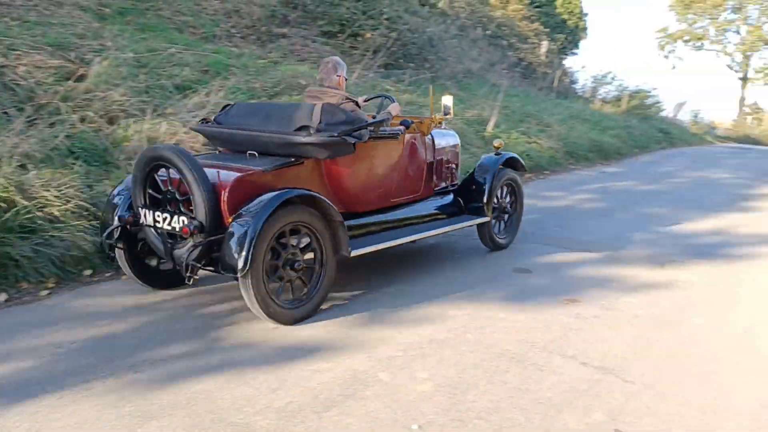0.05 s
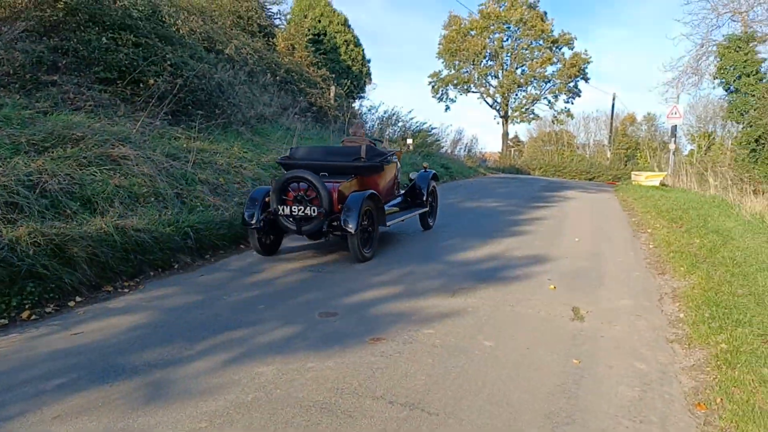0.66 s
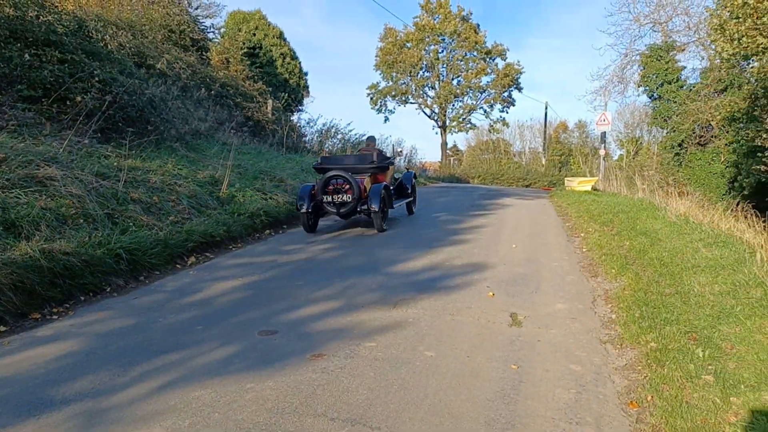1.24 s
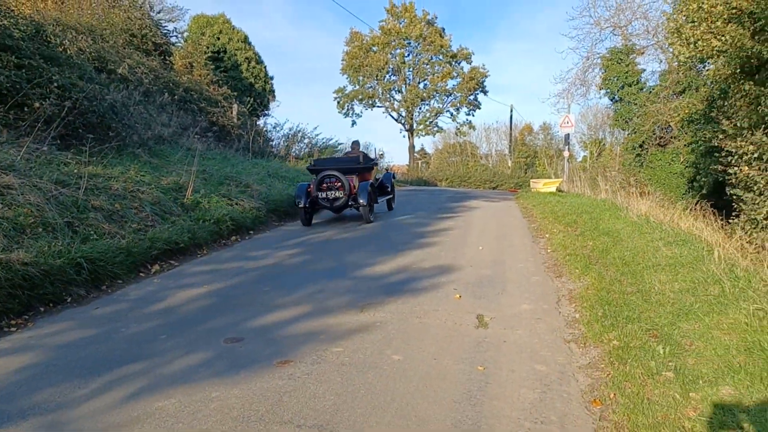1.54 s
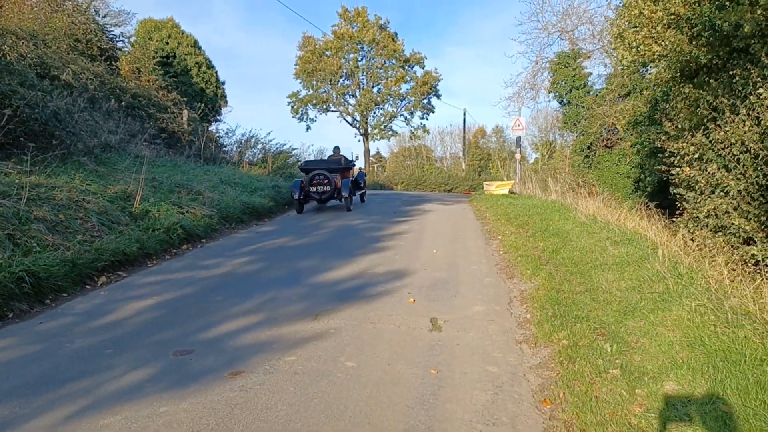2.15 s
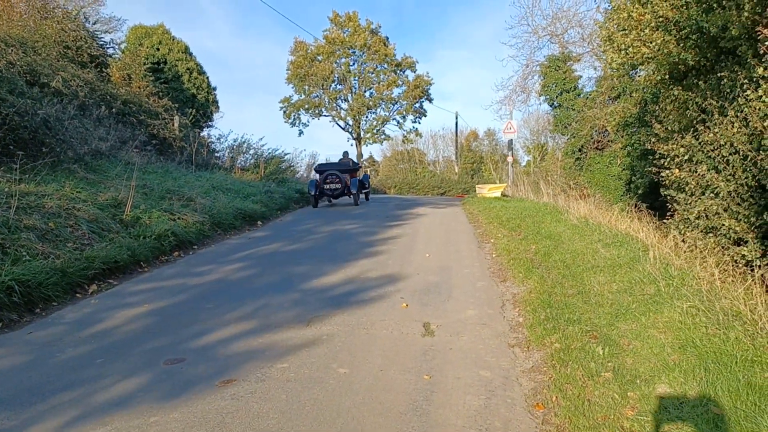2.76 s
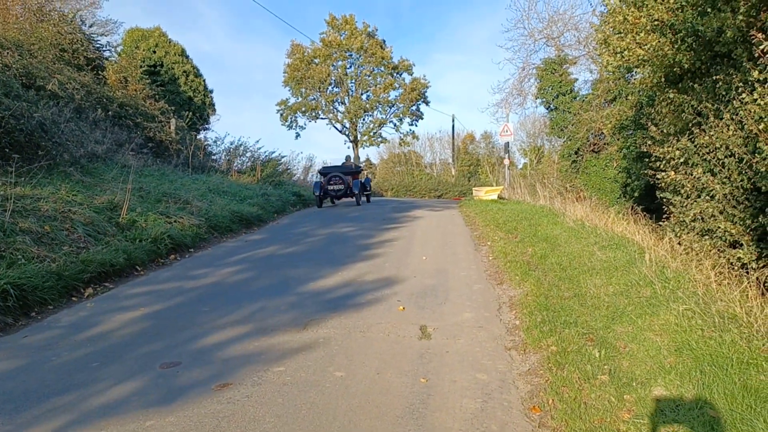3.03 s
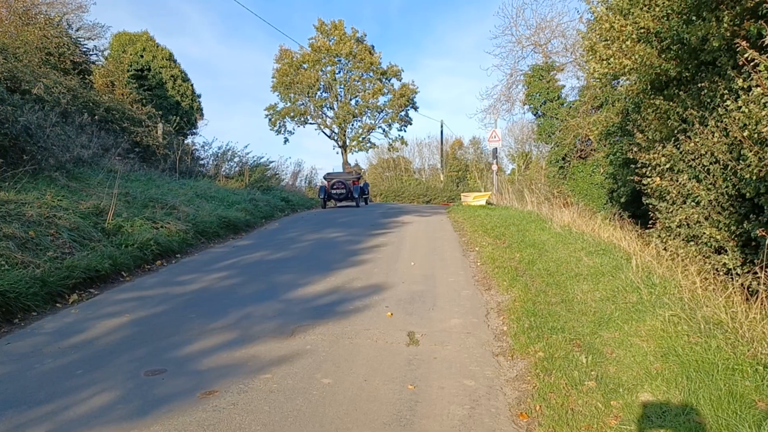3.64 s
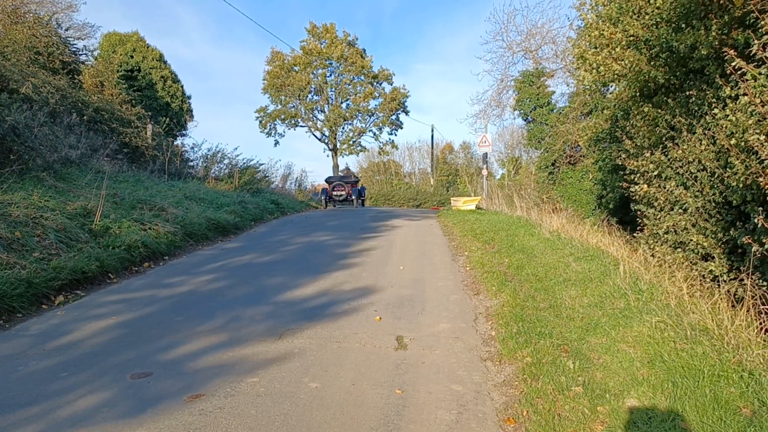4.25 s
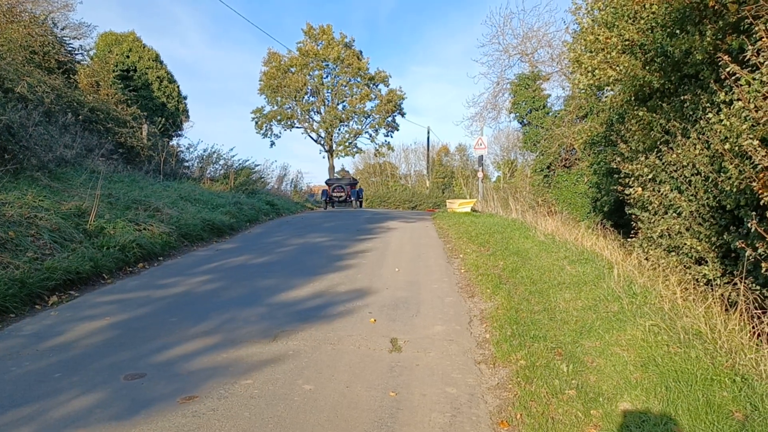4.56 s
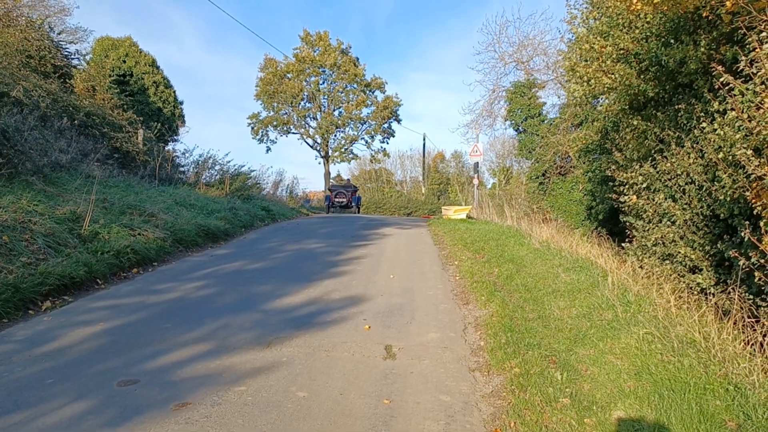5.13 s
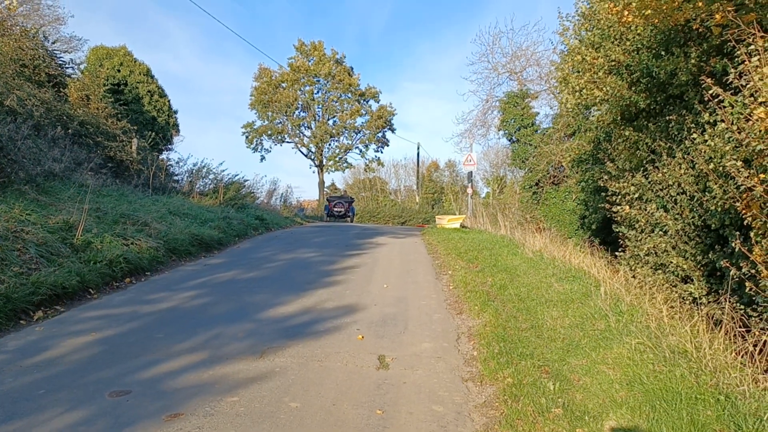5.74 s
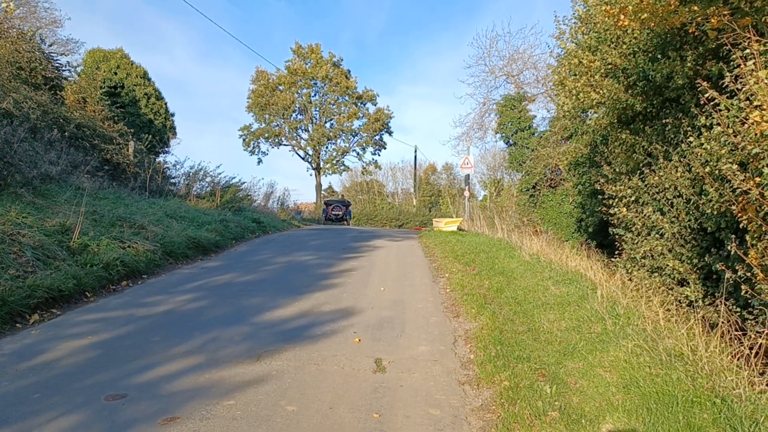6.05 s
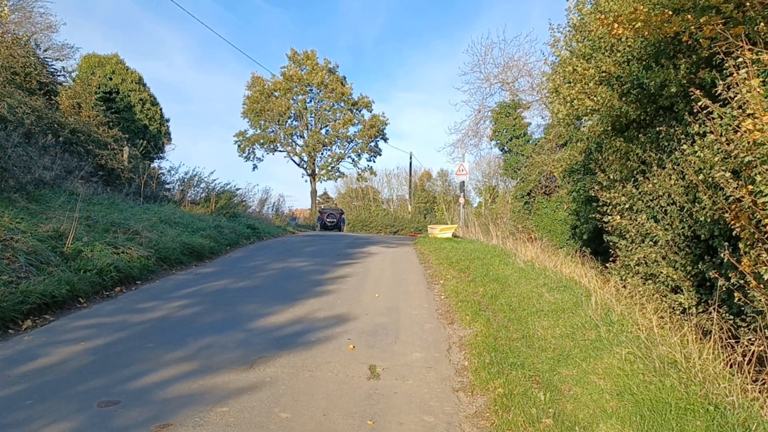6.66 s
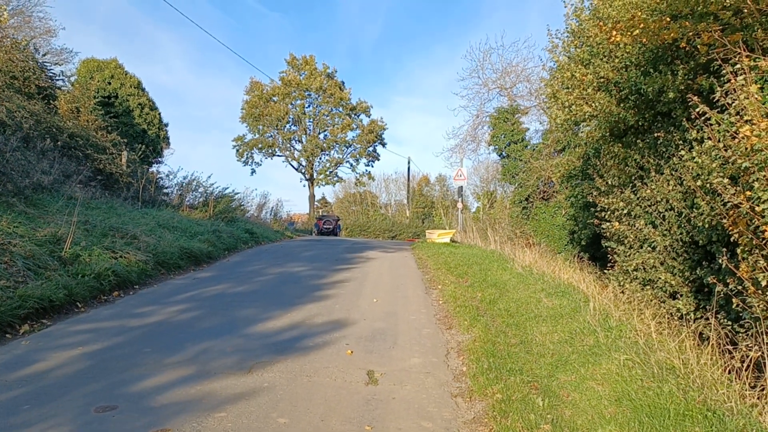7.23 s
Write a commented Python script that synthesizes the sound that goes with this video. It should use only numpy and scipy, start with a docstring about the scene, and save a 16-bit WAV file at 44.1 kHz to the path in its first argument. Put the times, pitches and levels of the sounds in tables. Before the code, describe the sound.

An old petrol car chugs close by and fades away uphill while gusts of wind thump and buffet the microphone.

```python
"""An old car climbs a windy lane

An old four-cylinder petrol car passes close by and labours away uphill, its engine slowing. The exhaust
drones, the machinery churns and whines, and one cylinder chuffs sharply in every engine cycle. Panels
sing, loose metal chinks and stones snap under the tyres. Gusts buffet the microphone's two openings
(its ports) unevenly and stir the hedges."""
import sys
import numpy as np
from scipy.fft import rfft, irfft, next_fast_len
from scipy.io import wavfile
from scipy.ndimage import uniform_filter1d, minimum_filter1d, map_coordinates

SR = 44100
rng = np.random.default_rng(int(sys.argv[2]) if len(sys.argv) > 2 else 0)


def waveform_to_disk(signal):
    """Save audio, clipped to [-1, 1], as 16-bit WAV at the path in sys.argv[1]."""
    frames = np.transpose(np.atleast_2d(signal))
    scaled = np.clip(frames, -1, 1) * 32767
    samples = np.round(scaled).astype(np.int16)
    wavfile.write(sys.argv[1], SR, samples)


N = 321930


def amp(db):
    """Turn decibels into a gain."""
    return 10 ** (np.asarray(db) / 20)


def unit(x):
    """Scale a signal to an average power of 1."""
    return x / np.sqrt(np.mean(x ** 2) + 1e-20)


def along(points, hz):
    """Read between (Hz, value) points on a log frequency scale."""
    f, v = np.transpose(points)
    return np.interp(np.log(hz + 1), np.log(f + 1), v)


def curves(rows):
    """Turn each column after the time into one value per sample."""
    times, *columns = np.transpose(rows)
    return [np.interp(np.arange(N) / SR, times, column) for column in columns]


def wobble(rate):
    """A smooth curve through rate random values a second."""
    return map_coordinates(rng.standard_normal(int(N * rate / SR) + 4), [np.arange(N) * rate / SR])


def filtered(x, response):
    """Filter x; response gives the gain at each frequency."""
    size = next_fast_len(N + SR // 2)
    return irfft(rfft(x, size) * response(np.fft.rfftfreq(size, 1 / SR)), size)[..., :N]


def panned(side_db):
    """Left and right gains, the left louder by side_db."""
    gains = amp(np.array([side_db, -side_db]) / 2)
    return gains / np.sqrt(np.mean(gains ** 2, axis=0))


def rush(spectrum, alike):
    """Stereo noise shaped by spectrum; alike says how well left and right match."""
    def response(hz):
        angle = np.arccos(np.clip(along(alike, hz), -1, 1)) / 2
        return amp(along(spectrum, hz)) * [np.cos(angle), np.sin(angle)]
    mid, side = filtered(rng.standard_normal((2, N)), response)
    return unit(np.array([mid + side, mid - side]))


def rough_tone(hz, spread_hz):
    """A tone whose pitch and level tremble."""
    angle = 2 * np.pi * np.cumsum(hz + spread_hz * wobble(300)) / SR
    return unit(np.sin(angle) * amp(1.1 * wobble(49)))


def add(track, start, sound):
    """Mix a short sound into a track, start seconds in."""
    part = track[..., max(round(start * SR), 0):][..., :sound.shape[-1]]
    part += sound[..., :part.shape[-1]]


def throb(firings, depth_db, sharp):
    """A gain that jumps at every firing and sinks until the next."""
    return unit(amp(depth_db * np.exp(-sharp * (firings % 1))))


# The exhaust pipe's resonances. Each row: pitch in Hz, width in Hz, level in dB.
PIPE_RESONANCES = [(104, 63, -6), (177, 39, 2.5), (237.6, 17.3, 6.5), (360, 21, -20), (503, 420, -13),
                   (640, 97, -21.5)]
# The pipe's boom, loudest up close. Each row: time in seconds, pitch in Hz, level in dB.
PIPE_DRONE = [(0, 188.1, -23), (.2, 183.1, -26), (.37, 183.9, -21), (.42, 187.7, -43.5), (.6, 179, -37),
              (1, 173.9, -40.5), (2.2, 172.2, -51.5), (3.2, 176, -78.5), (7.3, 170, -87)]
def exhaust(firings, beat_db, scatter_db=4, puff_gain=0.98, second_db=-19, third_db=-20):
    """Each firing sends a push and a puff of gas down the pipe, whose main resonance drones on."""
    def pipe_and_silencer(f):
        pipe = sum((-1) ** k * amp(db) * 1j * f * width / (hz * hz - f * f + 1j * f * width)
                   for k, (hz, width, db) in enumerate(PIPE_RESONANCES))
        silencer = (1j * f / (60 + 1j * f)) ** 4 / (1 + 1j * f / 1100) ** 2
        return pipe * silencer
    pushes = np.diff(np.floor(firings), prepend=0) * amp(scatter_db * wobble(30))
    puffs = rng.standard_normal(N) * throb(firings, depth_db=7.5, sharp=2.3)
    beat = unit(filtered(unit(pushes) + puff_gain * unit(puffs), pipe_and_silencer))
    drone_hz, drone_db = curves(PIPE_DRONE)
    # uneven firings nudge the drone's timing and strength
    angle = 2 * np.pi * np.cumsum(drone_hz) / SR + .3 * wobble(30) + .2 * wobble(110)
    waver = unit(amp(2.2 * wobble(28) + 1.5 * wobble(90)))
    drone = unit(np.sin(angle) + amp(second_db) * np.sin(2 * angle) + amp(third_db) * np.sin(3 * angle))
    return amp(beat_db) * beat + amp(drone_db) * waver * drone * throb(firings, depth_db=3, sharp=3.9)


# The engine's low churn and high sizzle. Each row: frequency in Hz, level in dB.
CHURN_SPECTRUM = [(60, -34), (200, -2.5), (400, 7.5), (700, 2), (900, -3), (1150, -2.5), (1350, -9),
                  (1700, -9), (2200, -13.5), (3000, -19.5), (4500, -25), (9000, -46.5)]
SIZZLE_SPECTRUM = [(1200, -25), (2400, 0.5), (3200, 1), (4500, -4.5), (6500, -8.5), (8700, -12.5),
                   (12500, -10.5), (15500, -17)]
# How alike the car's noise is left and right. Each row: frequency in Hz, likeness from 0 to 1.
CAR_LIKENESS = [(100, 0), (700, 0.86), (1300, 0.4), (2400, 0.5), (4400, 0.29), (8000, 0.12), (15000, 0.3)]
def machinery(firings, churn_db, sizzle_db, meshes_per_firing=22.3, gear_db=-12):
    """Valves and chains churn and sizzle with the firings; a faint gear sings down with the engine."""
    churn = rush(CHURN_SPECTRUM, CAR_LIKENESS) * throb(firings, depth_db=2, sharp=3.2)
    churn = unit(churn * amp(1.64 * wobble(120)))
    sizzle = rush(SIZZLE_SPECTRUM, CAR_LIKENESS) * throb(firings, depth_db=3, sharp=2.9)
    sizzle = unit(sizzle * amp(2.6 * wobble(140)))
    # the flywheel evens out the speed, and slack between the teeth blurs the tone
    shaft = uniform_filter1d(firings, size=20001, mode="nearest")
    angle = 2 * np.pi * meshes_per_firing * shaft + .65 * wobble(60)
    gear_hz = meshes_per_firing * SR * np.gradient(firings)
    gear = sum(amp(gear_db + along(CHURN_SPECTRUM, k * gear_hz) + 3 * wobble(7)) * np.sin(k * angle)
               for k in (1, 2))
    return amp(churn_db) * (churn + gear) + amp(sizzle_db) * sizzle


# Resonances of the engine block and body. Each row: pitch in Hz, width in Hz, boost in dB.
BODY_RESONANCES = [(531, 42, 3), (673, 66, 4), (1098, 127, 5.5), (1590, 190, 6), (1766, 30, 4),
                   (2170, 150, 7), (2570, 51, 4), (2719, 20, 6), (2880, 62, 4), (3117, 45, 6),
                   (3430, 53, 3), (3727, 35, 6), (4344, 32, 4), (5098, 18, 6), (5346, 30, 4)]
def bodywork(sound):
    """The car's metal boosts narrow bands of the sound passing through it."""
    def boost(f):
        return amp(sum(db / (1 + (2 * (f - hz) / width) ** 2) for hz, width, db in BODY_RESONANCES))
    return filtered(sound, boost)


# The transmission's whine. Each row: time in seconds, pitch in Hz, level in dB.
GEAR_WHINE = [(0, 1764, -46.5), (.8, 1694, -56), (2, 1640, -66.5), (3.1, 1634, -73), (5.15, 1610, -72),
              (5.7, 1563, -84), (6, 1457, -75.5), (6.27, 1440, -76.5), (6.5, 1430, -90), (7.15, 1425, -75)]
def whine(spread_hz=95):
    """A narrow band of gear noise sinks as the car slows."""
    hz, db = curves(GEAR_WHINE)
    angle = 2 * np.pi * np.cumsum(hz + spread_hz * wobble(300)) / SR
    return amp(db) * unit(wobble(130) * np.sin(angle) + wobble(130) * np.cos(angle))


# Ringing panels. Each row: start in seconds, length in seconds, pitch in Hz, level in dB.
PANEL_NOTES = [(0, .16, 675, -42.5), (0, .15, 587, -46.5), (.03, .36, 1770, -53), (.2, .22, 527, -46.5),
               (.2, .32, 635, -49), (.55, .25, 1696, -60), (.6, .3, 764, -59), (.78, .16, 675, -53),
               (1.62, .24, 527, -51.5)]
def panels(spread_hz=22, fade_s=0.019):
    """Body panels, shaken at their resonances by the engine, sing out briefly."""
    out, t = np.zeros(N), np.arange(N) / SR
    for start, length, hz, db in PANEL_NOTES:
        swell = np.clip(.5 + np.minimum(t - start, start + length - t) / fade_s, 0, 1)
        out += amp(db) * swell * rough_tone(hz, spread_hz)
    return out


def turbulence(spectrum, lump_db, rate):
    """Churning air: each port gets its own quick lumps around a steady strength."""
    air = rush(spectrum, alike=[(100, 0.16), (500, 0.3)])
    air *= amp(lump_db * np.array([wobble(rate), wobble(rate)]))
    power = uniform_filter1d(uniform_filter1d(air ** 2, size=2400, axis=1), size=700, axis=1)
    return air / np.sqrt(np.abs(power) + 1e-12)


# The wind's deep rumble and higher flutter. Each row: frequency in Hz, level in dB.
RUMBLE_SPECTRUM = [(15, -34.5), (35, -17), (55, -2), (85, 5), (125, 5.5), (200, -10), (330, -18),
                   (600, -43), (1200, -54.5), (3000, -82)]
FLUTTER_SPECTRUM = [(50, -4.5), (130, -3.5), (230, 8), (350, 1), (500, -6), (700, -25.5), (1000, -35),
                    (2000, -59.5), (5000, -87.5)]
# The breeze between gusts. Each row: time in seconds, level in dB.
BREEZE_LEVELS = [(0, -35), (1.5, -39.5), (2.15, -46), (2.36, -59.5), (2.5, -59), (3.2, -47.5),
                 (3.92, -51.5), (4.45, -46.5), (4.61, -61), (4.67, -42), (5.45, -43), (5.7, -48),
                 (5.99, -68), (6.07, -49), (6.15, -55), (6.38, -58), (6.7, -54), (7.3, -47.5)]
# Gusts. Each row: start and hold in seconds, left and right levels in dB, flutter over rumble in dB.
WIND_GUSTS = [(0, 0.17, -35, -22.5, -20), (0.198, 0.21, -37, -22.0, -2.5), (0.669, 0.066, -48.0, -26, -7),
              (0.818, 0.18, -40, -23.0, -8.5), (1.723, 0.054, -52, -27, -28),
              (1.891, 0.076, -38, -29.5, -1), (1.98, 0.071, -20, -26, -4.5), (2.069, 0.072, -28, -27, -1),
              (2.193, 0.13, -37, -37.5, -2), (2.393, 0.095, -43.0, -33, -14), (2.529, 0.13, -35, -33, -7.5),
              (2.684, 0.032, -36, -31, -14), (2.77, 0.14, -33, -34.5, -6), (2.94, 0.19, -38, -47.5, -9),
              (3.301, 0.032, -36, -35, 2), (3.376, 0.092, -32.5, -36.0, -2.5),
              (3.446, 0.079, -30, -29, -2.5), (3.548, 0.18, -42, -39, -8),
              (3.728, 0.15, -33.5, -50.5, -7.5), (3.97, 0.098, -40, -42.5, -3),
              (4.203, 0.044, -39.5, -45, -5), (4.259, 0.073, -27, -32, -3), (4.365, 0.053, -36.5, -43, -3),
              (4.701, 0.081, -36, -38.5, 1), (4.835, 0.088, -28, -29.5, -2),
              (4.948, 0.145, -28.5, -34, 4.5), (5.102, 0.14, -30.5, -26.5, -6), (5.25, 0.17, -33, -34, 3.5),
              (5.495, 0.11, -37, -39, 1.5), (5.605, 0.056, -47, -43.5, 5), (5.709, 0.12, -42, -37.5, -15),
              (6.167, 0.19, -44.5, -40.5, -6), (6.411, 0.07, -44.5, -36, -16),
              (6.495, 0.075, -34, -33.5, -10.5), (6.578, 0.089, -46, -40.0, -0.5),
              (6.714, 0.11, -41.5, -37.5, 0.5), (6.833, 0.1, -25.5, -24.5, -1.5),
              (6.95, 0.14, -31.0, -32, 7), (7.12, 0.078, -30.5, -33, -8), (7.209, 0.074, -44.5, -37, 0)]
def wind(attack_s=0.0068, release_s=0.0043, breeze_flutter_db=-6, swirl_db=1):
    """Gusts swell, hold and die over the breeze; they buffet the ports and stir the hedges."""
    def shares(flutter_db):
        ratio = amp(flutter_db) ** 2
        return np.array([1, ratio])[:, None, None] / (1 + ratio)
    t = np.arange(N) / SR
    breeze_db, = curves(BREEZE_LEVELS)
    # power by layer (rumble, flutter), port and sample
    power = shares(breeze_flutter_db) * amp([breeze_db, breeze_db]) ** 2
    for start, hold, left_db, right_db, flutter_db in WIND_GUSTS:
        near = slice(max(round(start * SR) - SR // 8, 0), round((start + hold) * SR) + SR // 8)
        age = t[near] - start
        swell = np.exp(-np.maximum(-age, 0) / attack_s - np.maximum(age - hold, 0) / release_s)
        power[..., near] += shares(flutter_db) * (amp([[left_db], [right_db]]) * swell) ** 2
    rumble = np.sqrt(power[0]) * turbulence(RUMBLE_SPECTRUM, lump_db=5, rate=55)
    flutter = np.sqrt(power[1]) * turbulence(FLUTTER_SPECTRUM, lump_db=9, rate=120)
    swirl = amp(swirl_db * np.array([wobble(26), wobble(28)]))
    return swirl * (rumble + flutter) + hedges(10 * np.log10(power.sum(axis=(0, 1))))


# Rustling leaves. Each row: frequency in Hz, level in dB.
HEDGE_SPECTRUM = [(30, -1.5), (100, 8.5), (450, 23), (900, 7), (1600, 5.5), (2600, -8.5), (4500, 3.5),
                  (6800, 7), (10000, 0), (13000, -3), (15500, -8)]
# How alike the rustle is left and right. Each row: frequency in Hz, likeness from 0 to 1.
HEDGE_LIKENESS = [(100, 0.69), (1500, 0.39), (5000, 0.15), (12000, .05)]
def hedges(wind_db, level_db=-71, stir=0.13):
    """The hedges rustle, a little louder in each gust."""
    gust_db = uniform_filter1d(wind_db, size=6000) - np.mean(wind_db)
    return amp(level_db + stir * gust_db + .6 * wobble(1.5)) * rush(HEDGE_SPECTRUM, HEDGE_LIKENESS)


def burst(t, attack_s, fade_s):
    """A level that rises quickly, then falls 60 dB every fade_s seconds."""
    return (1 - np.exp(-t / attack_s)) * amp(-60 * t / fade_s)


# Chinks in step with the firings. Each row: start in seconds, level in dB, pitch in Hz.
METAL_CHINKS = [(0.068, -39, 7600), (.198, -42.5, 5000), (0.231, -32.5, 6910), (0.261, -31.5, 5580),
                (0.294, -33, 5970), (.328, -40.5, 6050)]
def chinks(blur=0.2):
    """Loose metal rings briefly and roughly."""
    out, t = np.zeros((2, N)), np.arange(SR // 10) / SR
    strike = burst(t, attack_s=.0011, fade_s=.057)
    for start, db, hz in METAL_CHINKS:
        drift = blur * np.cumsum(rng.standard_normal((2, len(t))), axis=1)
        add(out, start, amp(db) * strike * np.sin(2 * np.pi * hz * t + drift))
    return out


# One chuff per engine cycle, spreading out on the hill. Each row: start in seconds, level in dB.
CYLINDER_CHUFFS = [(0.102, -33.0), (0.234, -36.5), (0.367, -37.5), (0.506, -37.0), (0.651, -41.0),
                   (0.802, -41.0), (0.943, -42.0), (1.093, -45.0), (1.248, -46.0), (1.403, -46.5),
                   (1.56, -48.0), (1.724, -49.0), (1.888, -47.0), (2.06, -55.0), (2.234, -56.5),
                   (2.414, -55.0), (2.6, -55.5), (2.793, -54.0), (2.989, -58.0), (3.185, -62.5),
                   (3.386, -57.5), (3.585, -57.0), (3.794, -58.5), (4.001, -59.5), (4.209, -61.0),
                   (4.414, -60.0), (4.624, -64.0), (4.833, -60.0), (5.038, -60.5), (5.244, -64.5),
                   (5.448, -66.5), (5.652, -64.5), (5.855, -67.0), (6.057, -69.5), (6.258, -69.0)]
# A chuff's hiss, and the metal tones it rings. Each row: frequency in Hz, level in dB.
CHUFF_SPECTRUM = [(500, -21), (1000, 3), (2000, 0), (3000, 2), (4000, 5), (5500, 1.5), (7100, -2.5),
                  (8500, -10), (12500, -20), (15500, -30)]
CHUFF_TONES = [(2190, -9), (3150, -9), (3900, -7.5), (4400, -9.5), (5950, -12), (6600, -14)]
def chuffs(gain_db=-3.5, tail_db=-16, tail_db_per_s=2.5, next_db=-9, next_cycles=.3, rattle_db=2.6):
    """One cylinder spits gas, the next more weakly; metal rings and the lane's banks add a tail."""
    power, t = np.zeros(N), np.arange(SR // 2) / SR
    spit = burst(t, attack_s=.0018, fade_s=.125)
    tail = amp(tail_db) * burst(t, attack_s=.012, fade_s=.45)
    starts, levels_db = np.transpose(CYLINDER_CHUFFS)
    for start, db, period in zip(starts, levels_db, np.gradient(starts)):
        scattered = tail * amp(tail_db_per_s * start)  # a greater share as the car gets farther away
        add(power, start, amp(db) ** 2 * (spit ** 2 + scattered ** 2))
        add(power, start + next_cycles * period, (amp(db + next_db) * spit) ** 2)
    ring = np.zeros((2, N))
    for hz, db in CHUFF_TONES:
        strength = amp(db + 0.83 * wobble(5))  # each chuff favours different tones
        ring += strength * np.array([rough_tone(hz, spread_hz=110) for _ in range(2)])
    level = np.sqrt(power) * amp(gain_db + rattle_db * wobble(170))
    return level * (rush(CHUFF_SPECTRUM, CAR_LIKENESS) + ring)


# The strongest swirls of air. Each row: time of the peak and length in seconds, level in dB,
# pitch in Hz, left minus right in dB.
EDDY_THUMPS = [(0.158, 0.022, -17.0, 137, -15), (0.7, 0.024, -22.0, 136, -17),
               (0.822, 0.022, -22.0, 147, 13), (0.925, 0.026, -20.0, 147, -6),
               (1.752, 0.024, -27.0, 129, -17), (1.845, 0.018, -23.5, 139, 7),
               (1.906, 0.01, -17.5, 294, -24), (1.927, 0.014, -14.5, 179, -25),
               (1.957, 0.016, -18.0, 255, -18), (1.995, 0.008, -8, 240, 12), (2.02, 0.026, -3.5, 150, 19),
               (2.098, 0.016, -16.5, 177, 6), (2.124, 0.008, -15.5, 220, 5), (2.284, 0.012, -25.0, 219, -4),
               (2.452, 0.022, -24.0, 101, -4), (2.57, 0.018, -26.5, 141, 2), (2.635, 0.028, -23.5, 127, 0),
               (2.78, 0.014, -25.5, 218, 1), (2.898, 0.014, -26.0, 113, -17),
               (3.457, 0.022, -16.0, 150, -3), (3.53, 0.024, -18.0, 127, 1), (3.823, 0.018, -26.5, 115, 12),
               (4.287, 0.024, -17.5, 213, 1), (4.317, 0.02, -18.0, 172, 0), (4.381, 0.014, -26.5, 187, 13),
               (4.705, 0.01, -22.5, 230, 4), (4.758, 0.02, -24.5, 255, -2), (4.862, 0.014, -19.5, 191, -2),
               (4.897, 0.016, -18.5, 165, -3), (4.967, 0.008, -20.0, 286, 1), (4.984, 0.01, -19.5, 169, 9),
               (5.014, 0.01, -22.0, 199, 3), (5.051, 0.009, -20.0, 317, 4), (5.126, 0.018, -17.5, 127, 0),
               (5.18, 0.024, -16.5, 126, 1), (5.27, 0.011, -20.0, 193, -6), (5.34, 0.022, -23.5, 215, 8),
               (5.533, 0.01, -24.5, 266, 1), (5.563, 0.016, -23.0, 145, -1), (6.851, 0.016, -18.5, 164, 1),
               (6.882, 0.024, -18.5, 161, -5), (6.922, 0.008, -23.0, 208, 7), (6.999, 0.011, -20.0, 255, 2),
               (7.018, 0.014, -21.0, 239, 4), (7.145, 0.018, -23.0, 201, 1)]
def eddies(swirl=.24, lead_cycles=.4, steepen=.22):
    """An eddy thumps both ports with a few uneven, steep waves, one port slightly before the other."""
    out, t = np.zeros((2, N)), np.arange(SR // 12) / SR
    middle = t.mean()
    for peak_s, length, db, hz, side_db in EDDY_THUMPS:
        knots = rng.standard_normal((2, 64))
        bend = np.array([map_coordinates(port, [t * 450], mode="mirror") for port in knots])
        cycles = np.cumsum(hz * np.exp(swirl * bend), axis=1) / SR
        cycles = cycles - cycles[:, [len(t) // 2]]
        angle = 2 * np.pi * (cycles + rng.random() + lead_cycles * rng.random((2, 1)))
        swell = np.exp(-(2 * (t - middle) / length) ** 2)
        thump = swell * (np.sin(angle) + steepen * np.sin(2 * angle) * swell)
        add(out, peak_s - middle, amp(db) * panned(side_db)[:, None] * thump)
    return out


# The loudest stones. Each row: start in seconds, crunch level in dB, tick level in dB.
STONE_SNAPS = [(1.001, -49, -53), (1.045, -53, -55), (1.932, -54, -74), (2.352, -68, -70),
               (2.734, -59, -66), (2.904, -59, -73), (2.915, -56, -72), (3.389, -66, -68),
               (4.065, -70, -64), (4.149, -73, -68), (5.791, -67, -73)]
# A stone's crunch and its higher tick. Each row: frequency in Hz, level in dB.
CRUNCH_SPECTRUM = [(1500, -34), (3500, 2.5), (6000, 2), (9000, -2.5), (13000, -12), (15500, -15.5)]
TICK_SPECTRUM = [(5000, -25), (9000, -2), (12000, 2), (15500, -5.5)]
def grit(fine_db, scatter_db=4, grains=70):
    """Stones crunch and tick under the tyres; finer grit crackles at random."""
    levels, t = np.zeros((2, N)), np.arange(SR // 10) / SR
    snap = burst(t, attack_s=.0012, fade_s=.062)
    for start, crunch_db, tick_db in STONE_SNAPS:
        add(levels, start, amp([[crunch_db], [tick_db]]) * snap)
    for at, size in zip(rng.integers(N, size=grains), rng.standard_normal(grains)):
        add(levels[0], at / SR, amp(fine_db[at] + scatter_db * size) * snap)
    crunch, tick = levels * amp(1.6 * wobble(570))
    return crunch * rush(CRUNCH_SPECTRUM, CAR_LIKENESS) + tick * rush(TICK_SPECTRUM, CAR_LIKENESS)


def engine_cycles(extra=7):
    """Count engine cycles, one from chuff to chuff, with extra ones after the last chuff."""
    starts = np.transpose(CYLINDER_CHUFFS)[0]
    starts = np.pad(starts, (1, extra), mode="reflect", reflect_type="odd")
    return np.interp(np.arange(N) / SR, starts, np.arange(len(starts)))


# The car's loudness swells and dips; it drops just after the big gust at two seconds.
# Each row: time in seconds, level in dB.
CAR_LEVEL = [(0, 0), (1.4, -0.5), (1.9, 2), (2.15, -4), (3.1, -3), (4.35, -1.5), (4.65, -8), (5.05, -2),
             (6, -7.5), (7.3, 1)]
def receding(cycles, loss_db_per_m, swell_depth=1, start_m=3.89, metres_per_cycle=0.69):
    """Level change in dB: the sound swells and dips, spreads with distance and fades along the verge."""
    travel_m = metres_per_cycle * cycles
    swell_db, = curves(CAR_LEVEL)
    return swell_depth * swell_db - 20 * np.log10(1 + travel_m / start_m) - loss_db_per_m * travel_m


# Which side the car is louder on. Each row: frequency in Hz, left minus right in dB.
CAR_BALANCE = [(150, -4), (400, -3), (700, -1), (1300, 2), (2400, .5), (4400, -.5), (8000, -2), (15000, -3)]
def scene(cylinders=4):
    """The car drives away, each cylinder firing once a cycle, while wind blows on the microphone."""
    cycles = engine_cycles()
    firings = cylinders * cycles
    beat_db = -30 + receding(cycles, loss_db_per_m=1.06, swell_depth=3.2)
    churn_db = -35 + receding(cycles, loss_db_per_m=0.56, swell_depth=0.79)
    sizzle_db = -42.5 + receding(cycles, loss_db_per_m=0.96, swell_depth=1.2)
    crackle_db = -49.5 + receding(cycles, loss_db_per_m=1.1)
    engine = exhaust(firings, beat_db) + bodywork(machinery(firings, churn_db, sizzle_db) + chuffs())
    car = engine + panels() + chinks() + grit(crackle_db)
    return filtered(car, lambda hz: panned(along(CAR_BALANCE, hz))) + whine() + wind() + eddies()


def record(dry, bass_hz=54, top_hz=15750):
    """The camera turns down peaks above full scale, thins the deep bass and cuts the highest treble."""
    needed = 1 / np.maximum(np.max(np.abs(dry), axis=0), 1)
    gain = uniform_filter1d(minimum_filter1d(needed, size=800), size=600)
    return filtered(dry * gain, lambda hz: (hz < top_hz) / np.sqrt(1 + (bass_hz / (hz + 1)) ** 4))


dry = scene()
out = record(dry)
waveform_to_disk(out)
```